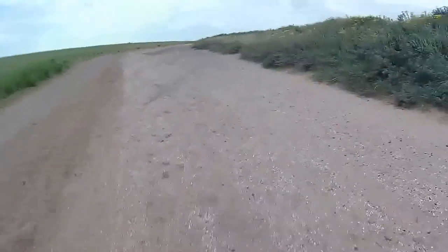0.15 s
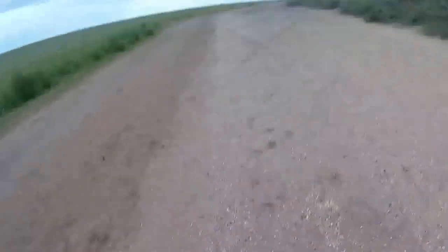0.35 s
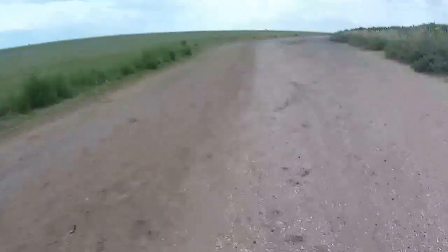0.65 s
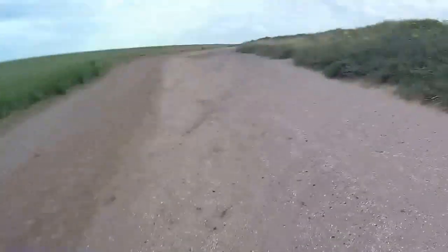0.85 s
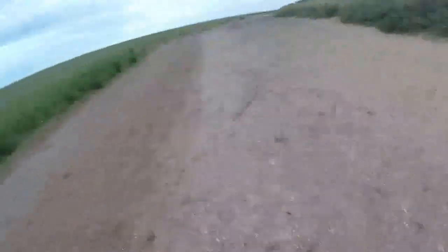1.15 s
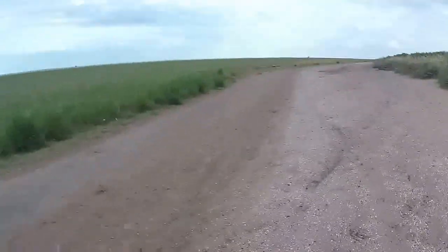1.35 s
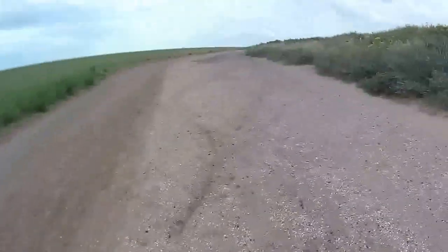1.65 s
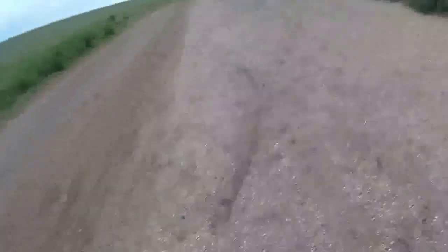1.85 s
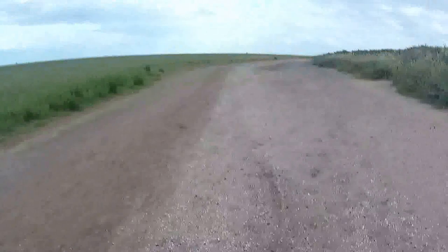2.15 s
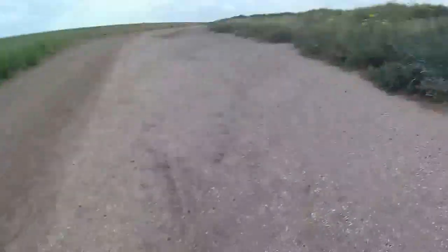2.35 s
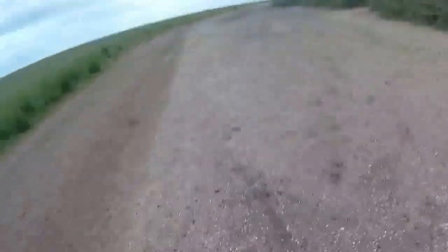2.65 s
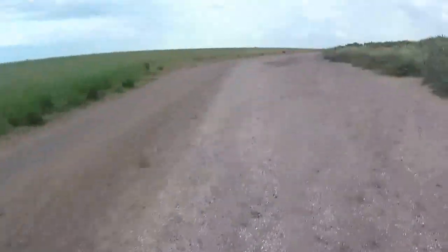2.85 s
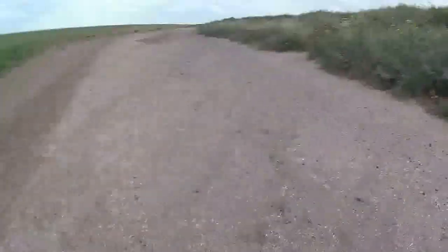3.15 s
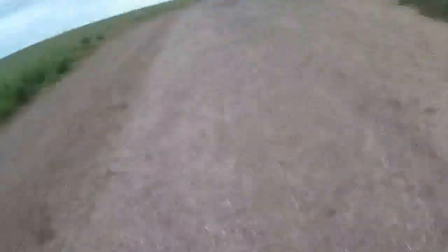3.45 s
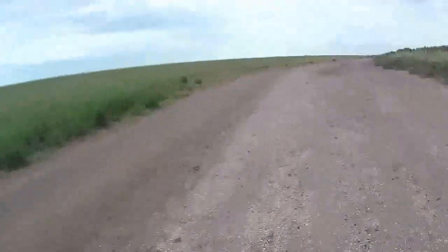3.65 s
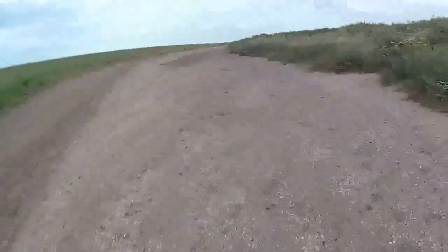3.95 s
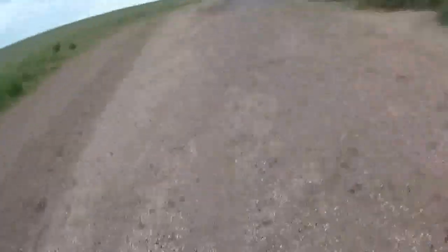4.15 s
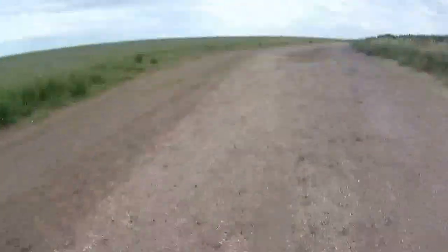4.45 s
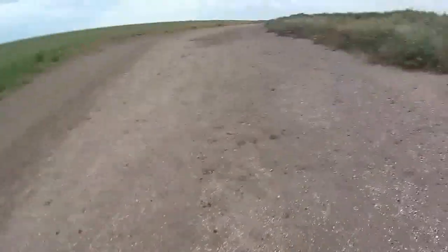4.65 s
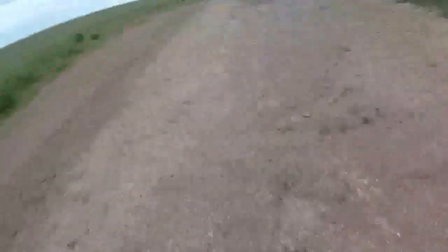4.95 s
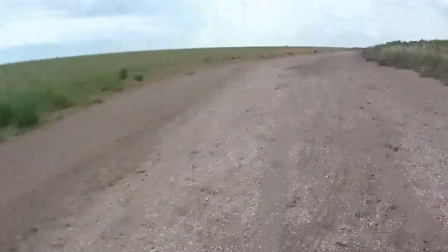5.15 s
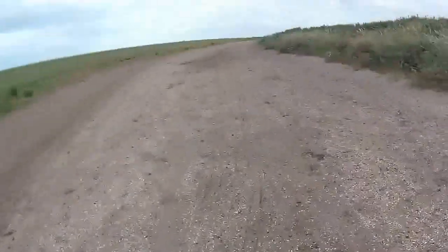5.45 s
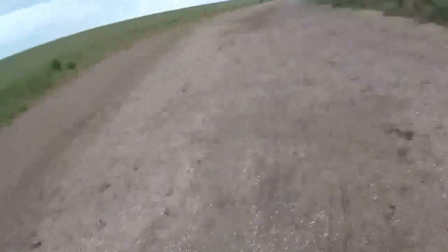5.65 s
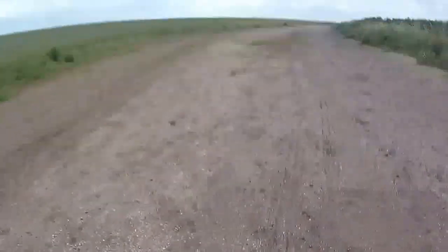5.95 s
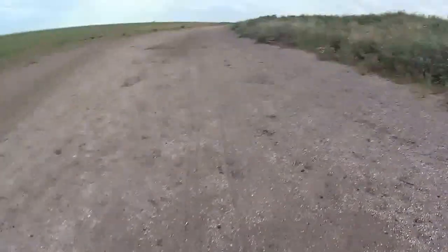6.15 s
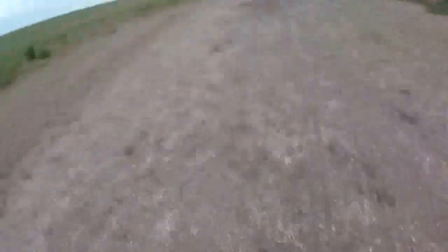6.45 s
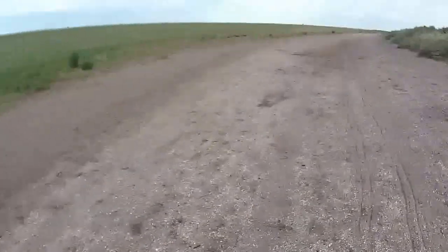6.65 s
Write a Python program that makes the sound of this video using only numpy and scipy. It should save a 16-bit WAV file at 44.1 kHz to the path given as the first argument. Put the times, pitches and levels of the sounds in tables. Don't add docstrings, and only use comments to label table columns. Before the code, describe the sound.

Boxy plastic knocking dominates, carried through the shell into the microphone. Each stride brings quick lead-up taps, a hard distorted slam, small rebounds, then a duller landing thud and push-off bump. Scratchy strap strokes swell at every step, with gritty cracks, low rumble and faint hiss. The open-air sandy track is only hinted at by thin gravel crunch, wind and a tiny insect chirp.

```python
import sys
import numpy as np
from scipy import signal
from scipy.fft import rfft, irfft, next_fast_len
from scipy.io import wavfile
from scipy.ndimage import map_coordinates

SR = 44100
rng = np.random.default_rng(int(sys.argv[2]) if len(sys.argv) > 2 else 0)


def ratio(d):
    e = np.asarray(d, float) / 20
    return 10 ** e


def to_wav(s):
    ch = np.atleast_2d(s).T
    pcm = np.round(np.clip(ch, -1, 1) * 32767)
    wavfile.write(sys.argv[1], SR, pcm.astype(np.int16))


N = 299439


def unit(x):
    return x / np.sqrt(np.mean(x ** 2) + 1e-20)


def curves(rows):
    s, *columns = np.transpose(rows)
    return [np.interp(np.arange(N) / SR, s, column) for column in columns]


def wobble(rate):
    knots = rng.standard_normal(int(N * rate / SR) + 4)
    return map_coordinates(knots, [np.arange(N) * rate / SR])


def filtered(x, response):
    m = next_fast_len(N + SR // 2)
    return irfft(rfft(x, m) * response(np.fft.rfftfreq(m, 1 / SR)), m)[..., :N]


def resonance(f, center, width):
    return 1j * f * width / (center * center - f * f + 1j * f * width)


# frequency in Hz, width in Hz, level in dB.
THUD = [(42.7, 84, -14), (89, 66.6, -1.5), (196, 136, 3), (271, 152.4, 1.5)]
HOLLOW = [(575, 212, -7.5), (872.5, 91, -2.5), (1140, 98, -0.5)]
RING = [(1404, 177, -10.5), (1737, 173, -3), (2078, 175, 0.5), (2312, 207, -4.5), (2490, 90, -7.5),
        (2881, 191, -8), (3387, 204, -9.5), (3880, 440, -13.5)]
BRIGHT = [(4900, 910, -0.5), (5360, 480, 5.5), (6160, 140, -7)]
EDGE = [(8490, 360, 2.5), (10400, 300, -7), (11000, 970, -6), (13600, 1500, -5.5)]


def shell(x, modes, wall_hz):
    def response(f):
        ring = sum((-1) ** k * ratio(db) * resonance(f, hz, width) for k, (hz, width, db) in enumerate(modes))
        ring = ring / (1 + 1j * f / wall_hz) ** 2
        return ring / np.sqrt(np.mean(abs(ring) ** 2))
    return filtered(x, response)


def grit(rate, spread_db):
    happens = rng.random(N) < rate / SR
    size = ratio(spread_db * np.minimum(rng.exponential(size=N), 4))
    slips = happens * size * rng.choice([-1, 1], N)
    return unit(unit(slips) + 0.71 * rng.standard_normal(N))


def contacts(s, ms):
    size = SR // 50
    u = np.arange(size) / SR / (np.clip(ms, 0.2, 5)[:, None] / 1000)
    rattle = rng.standard_normal((len(s), size)) * np.sqrt(u + 2.0) * np.exp(-u)
    rattle /= np.linalg.norm(rattle, axis=1, keepdims=True)
    push = -1.0 * (u == 0)
    where = np.round(s * SR).astype(int)[:, None] + np.arange(size)

    def train(force, db):
        return np.bincount(where.ravel(), (force * ratio(db)[:, None]).ravel(), N + size)[:N]
    return rattle, push, train


# stroke in seconds, stroke level in dB, rise in seconds, push in seconds, push level in dB.
STROKES = [(0.029, -26.5, 0.038, 0.27, -39), (0.43, -25, 0.045, 0.55, -32),
           (0.807, -23.5, 0.031, 0.98, -36), (1.186, -27.5, 0.043, 1.39, -41),
           (1.561, -28.5, 0.039, 1.695, -37), (1.958, -26.5, 0.058, 2.065, -32.5),
           (2.322, -27, 0.032, 2.424, -40.5), (2.72, -29, 0.038, 2.85, -34.5),
           (3.094, -25, 0.032, 3.248, -32.5), (3.476, -25, 0.02, 3.567, -28.5),
           (3.848, -28.5, 0.026, 4.06, -40), (4.252, -27, 0.056, 4.355, -32.5), (4.61, -30, 0.038, 8, -45),
           (5.011, -27, 0.055, 5.12, -32.5), (5.372, -26.5, 0.057, 5.43, -33),
           (5.744, -30.5, 0.055, 5.87, -37.5), (6.1, -29.5, 0.034, 6.3, -40.5),
           (6.469, -27, 0.039, 6.535, -33), (6.84, -26, 0.071, 6.95, -27)]
# time in seconds, slack level in
# dB, letting go in seconds.
SLACK = [(0.304, -61, 0.023), (0.663, -48.5, 0.0099), (1.083, -55, 0.31), (1.487, -49, 0.15),
         (1.819, -57.5, 0.048), (2.204, -48, 0.02), (2.604, -62, 0.052), (2.785, -39.5, .012),
         (2.99, -48, 0.058), (3.366, -58, 0.1), (3.811, -50, 0.15), (4.106, -56.5, 0.035),
         (4.48, -50.5, 0.026), (4.879, -58, 0.052), (5.248, -52, 0.018), (5.53, -43, 0.034),
         (5.667, -47.5, 0.12), (6.001, -60, 0.062), (6.25, -38.5, 0.033), (6.336, -66.5, 0.026),
         (6.715, -51.5, 0.01),
         (1.5, -41, 0.02),
    (3.548, -41, 0.015),
    (5.2, -46, 0.039),
    (2.36, -39, 0.01),
]
# time in seconds, level in dB.
CATCHES = [(0.06, -33), (0.61, -40), (1.303, -30), (2.13, -34), (2.28, -43), (2.546, -35.5), (2.629, -44),
           (2.76, -34), (3.62, -37.5), (4.455, -42.5), (4.7, -37), (5.631, -45.5), (6.19, -33.5),
           (6.599, -31.5), (0.565, -31.5), (0.83, -31), (1.335, -37), (1.39, -29.5), (3.51, -33.5),
           (3.68, -31), (4.23, -30.5), (6.67, -31), (0.87, -31), (3.865, -35.5)]


def pressure():
    start_db, fall_s, dip_db, hold_db = -46, 0.034, -40.5, -39.5
    catch_db_per_s = 410
    points = []
    for s, db, rise, push_s, push_db in STROKES:
        points += [(s - rise, start_db), (s, db), (s + fall_s, dip_db), (push_s, push_db)]
    for s, db, let_go in SLACK:
        points += [(s - let_go, hold_db), (s, db)]
    t = np.arange(N) / SR
    steps = curves(sorted(points))[0]
    return np.max([steps] + [db - catch_db_per_s * abs(t - s) for s, db in CATCHES], axis=0)


# frequency in Hz, density in dB per Hz.
HISS = [(20, 6), (60, 8), (200, -20), (700, -15.5), (2100, -21), (4500, -50), (7000, -31.5), (13600, -66),
        (14220, -33), (14800, -36)]


def floor(scrape_db):
    f, db = np.transpose(HISS)
    noise = rng.standard_normal((2, N))
    a, b = filtered(noise, lambda hz: ratio(np.interp(np.log(hz + 1), np.log(f), db)))
    wind = filtered(np.array([a + 0.19 * b, a - 0.6 * b]), lambda hz: hz < 90)
    hiss = filtered(np.array([a + 0.11 * b, a - 0.1 * b]), lambda hz: hz >= 90)
    gusts = ratio(1.4 * wobble(12) + 0.84 * (scrape_db + 40.0))
    return ratio(-46.0) * unit(gusts * wind + hiss)


# start in seconds, end in seconds, pitch in Hz, level in dB, pulses a second.
INSECTS = [
    (1.833, 1.886, 6000, -58, 167),
    (3.62, 3.693, 6600, -66, -2),
]


def insects():
    t = np.arange(N) / SR
    out = 0
    for start, end, hz, db, rate in INSECTS:
        swell = np.sqrt(np.clip(4 * (t - start) * (end - t), 0, None)) / (end - start)
        pulses = np.cos(np.pi * rate * t) ** 10
        tone = np.sin(2 * np.pi * hz * t + wobble(300))
        out = out + ratio(db + 2 * wobble(60)) * swell * pulses * tone
    return out


# time in seconds, level in dB.
SPRAYS = [(0.88, -60), (1.865, -59), (2.61, -60), (2.92, -62), (5.03, -57), (5.45, -59), (6.28, -58),
          (6.5, -61), (3.68, -64), (1.58, -62), (1.545, -65), (6.08, -61)]


def spray():
    t = np.arange(N) / SR
    half_s = 2 * 0.015
    return sum(ratio(db) * np.clip(1 - ((t - s) / half_s) ** 2, 0, 1) ** 2 for s, db in SPRAYS)


# frequency in Hz, width in Hz, level in dB.
AIR = [(10100, 7100, -6.5), (12400, 3600, -1.5), (14440, 340, 2.5)]


def crunch(scrape_db):
    sand = shell(grit(rate=5000, spread_db=3), AIR, wall_hz=18900)
    flicker = ratio(3 * wobble(110))
    strokes = ratio(-69.5 + 1.07 * (scrape_db + 37.5))
    return (ratio(-69.5) + strokes * flicker + spray() * flicker) * unit(sand)


# time in seconds, pitch in Hz, level in dB.
SQUEAK = [
    (4.893, 3420, -72),
    (4.9, 3440, -68),
    (4.906, 3300, -61),
    (4.96, 3340, -62),
    (4.975, 3305, -80),
]
# multiple of the pitch, level in dB.
SQUEAK_TONES = [(1, 1), (2, -2), (3, -4), (4, -8)]


def squeak():
    hz, db = curves(SQUEAK)
    t = np.arange(N) / SR
    turn = 2 * np.pi * np.cumsum(hz) / SR
    tone = sum(ratio(level + 1.5 * wobble(90)) * np.sin(k * turn) for k, level in SQUEAK_TONES)
    return ratio(db) * tone * (t > SQUEAK[0][0]) * (t < SQUEAK[-1][0])


# time in seconds, peak level in dB.
THUMPS = [(0.228, -26), (1.148, -29), (1.698, -26), (2.286, -24.5), (2.418, -34.5), (3.588, -31.5),
          (3.797, -19.5), (3.815, -29), (4.356, -36), (4.638, -36), (6.132, -30), (6.438, -29.5),
          (5.118, -37), (5.9, -37)]


def thumps():
    s, db = np.transpose(THUMPS)
    shove = np.bincount(np.round(s * SR).astype(int), -ratio(db + 26), N)
    return shell(shove, THUD[1:], wall_hz=500)


# time in seconds, peak level in dB,
# bright level in dB.
CRACKS = [(0.0343, -20, -14), (0.0594, -18, -11), (0.426, -18, -19), (0.4424, -24, -14), (0.5631, -20, -16),
          (0.623, -16, -16), (0.8294, -26, -14), (0.8744, -22, -14), (1.1882, -22, -16), (2.42, -19, -16),
          (2.4864, -35, -14), (2.4977, -21, -14), (2.7571, -21, -14), (3.1094, -18, -16.5),
          (4.2448, -21, -14), (4.2564, -19, -14), (4.2832, -20, -17), (4.3534, -23, -14),
          (4.3684, -26, -14), (4.629, -27, -12), (4.7094, -29, -14), (4.999, -13, -18), (5.362, -14, -14),
          (5.389, -16, -13), (5.5734, -26, -14), (6.1124, -19, -14), (6.212, -21, -14), (6.539, -30, -14),
          (6.6694, -25, -15),
          (0.3944, -28, -16),
    (1.669, -25, -16),
    (3.492, -17, -16),
    (3.6094, -26, -16),
    (4.8033, -15, -15.5),
    (5.699, -22, -18),
]


def cracks():
    s, db, bright_db = np.transpose(CRACKS)
    rattle, _, train = contacts(s, np.full(len(s), 1.2))
    peak_db = db + 8.5
    return (shell(train(rattle, peak_db), RING, wall_hz=4000)
            + shell(train(rattle, peak_db + bright_db), BRIGHT, wall_hz=15000))


# time in seconds, rumble level in dB, dying rate in dB per second.
LURCHES = [(0.025, -37, 56), (0.409, -37, 47), (0.93, -33.5, 126), (1.237, -33.5, 115), (1.541, -32, 142),
           (1.691, -32.5, 202), (1.881, -36.5, 30), (2.29, -32, 400), (2.614, -39.5, 60), (3.24, -35, 150),
           (3.392, -38, 60), (3.692, -37, 30), (4.166, -40, 59), (5.37, -33.5, 89), (5.961, -45, 302),
           (6.211, -44, 160), (6.435, -43, 80), (0.83, -41, 150), (1.15, -36, 150), (2.02, -40, 150),
           (2.71, -34, 150), (3.13, -33, 150), (3.59, -35, 150), (4.35, -41, 120), (4.64, -38, 120),
           (4.95, -33.5, 120), (5.07, -37.5, 150), (5.56, -34, 100), (5.68, -34.5, 100), (5.81, -36, 150),
           (6.08, -38, 100)]


def sway(effort_db):
    rise_db_per_s = 152
    t = np.arange(0, N / SR, 0.001)
    lurch = sum(ratio(db - np.where(t > s, dying, rise_db_per_s) * abs(t - s)) ** 2 for s, db, dying in LURCHES)
    steady = ratio(-43 + 0.24 * effort_db)
    return np.sqrt(np.interp(np.arange(N) / SR, t, lurch) + steady ** 2)


# frequency in Hz, width in Hz, level in dB.
BODY = [(655, 500, -1), (1300, 600, 1), (2600, 1300, -2.5)]


def rubbing(scrape_db):
    force = grit(rate=1200, spread_db=3) * ratio(2.2 * wobble(220))
    coarse = grit(rate=1500, spread_db=2.5)
    other_force, other_coarse = np.roll(force, SR), np.roll(coarse, SR)
    spots = ratio(1.6 * np.array([wobble(30), wobble(30), wobble(40)]))
    scrape = unit(shell(force * spots[0], RING[:4], wall_hz=5600)
                  + ratio(-3.5) * shell(coarse * spots[1], RING[4:], wall_hz=6100)
                  + ratio(-6.5) * shell(other_force * spots[2], RING[2:3], wall_hz=5000)
                  + ratio(-9) * shell(force, HOLLOW, wall_hz=2480)
                  + ratio(-10.5) * shell(other_coarse, BODY, wall_hz=4000))
    heave = ratio(2 * wobble(22))
    rumble = unit(shell(force * heave, THUD, wall_hz=1230))
    fizz = unit(shell(coarse, BRIGHT, wall_hz=16200) + ratio(-7.5) * shell(force, EDGE, wall_hz=16000))
    effort_db = scrape_db + 38
    return (ratio(scrape_db - 1) * scrape
            + sway(effort_db) * ratio(-6.5 + 0.26 * effort_db) * rumble
            + (ratio(-90) + ratio(-60.0 + 1.21 * effort_db)) * fizz)


# time in seconds, peak level
# in dB.
SNAPS = [(0.3607, -26), (0.7504, -34), (0.9453, -27), (1.125, -24), (1.4434, -32), (1.8896, -24),
         (2.2754, -23.5), (2.6356, -19), (3.0405, -25), (3.248, -28), (3.4204, -22), (3.794, -31),
         (4.171, -26), (4.6274, -32), (4.9297, -31.5), (5.017, -29), (5.388, -25.5), (5.6837, -22),
         (6.4152, -27.5), (0.058, -33), (0.7612, -29), (0.9882, -38), (1.3823, -37), (2.837, -40),
         (3.6053, -31), (4.2542, -36), (4.26, -32), (5.467, -29), (5.5717, -31), (1.5055, -28),
         (0.442, -36), (0.528, -34), (1.037, -35), (1.37, -39), (2.816, -36), (3.804, -33), (3.863, -37),
         (4.558, -23), (6.116, -29), (6.6448, -34), (5.321, -32), (5.939, -33), (5.949, -41), (0.833, -31)]


def snaps():
    dry_edge = [(s, db - 33) for s, db in LEAD_DRY]
    hollow_edge = [(s, db - 32) for s, db in LEAD_HOLLOW]
    s, db = np.transpose(SNAPS + dry_edge + hollow_edge)
    rattle, push, train = contacts(s, np.full(len(s), 1.3))
    return shell(train(rattle, db + 4.5), EDGE, wall_hz=16800)


# time in seconds, peak level in dB, bright level in dB, contact time in ms.
SLAMS = [
    (0.742, 8, -17, 0.68),
    (1.4982, 7.5, -23, 1.9),
    (2.2636, 7.5, -30, 0.63),
    (3.0287, 7, -31, 1.6),
    (3.7949, -0.5, -15, 4),
    (4.5474, 2, -12, 2),
    (5.312, 3.5, -14, 0.46),
    (6.0399, 2, -17, 2.4),
    (6.7828, 4.5, -11, 1.2),
]


def slams():
    s, db, *_ = np.transpose(SLAMS)
    rattle, _, train = contacts(s + 0.00248, np.full(len(s), 2.2))
    chatter = train(rattle, db - 1)
    return (shell(chatter, RING, wall_hz=3000) + ratio(-12.5) * shell(chatter, HOLLOW, wall_hz=2700)
            + ratio(-30) * shell(chatter, BRIGHT, wall_hz=15000))


# time in seconds, peak level in dB.
REBOUNDS = [(0.751, -18), (0.7611, -8), (1.509, -8), (1.5298, -13.5), (2.278, -12.5), (2.2965, -13),
            (3.0432, -8.5), (3.066, -15), (3.825, -12), (4.557, -6.5), (4.5706, -17), (5.3199, -10.5),
            (6.0682, -11.5)]
# time in seconds, peak level in dB.
LEAD_TICKS = [
    (0.5889, -9.5),
    (1.356, -13.5),
    (2.1278, -10.5),
    (2.882, -14),
    (3.6365, -10),
    (4.4125, -21),
    (5.1716, -9),
    (6.628, -11.5),
]
# time in seconds, peak level in dB.
LEAD_HOLLOW = [
    (0.6381, -8.5),
    (1.405, -4.5),
    (2.1685, -6),
    (2.928, -8),
    (3.7087, -7),
    (4.4543, -2.5),
    (5.2107, -6.5),
    (5.9494, -2),
    (6.695, -4),
]
# time in seconds, peak level in dB.
LEAD_DRY = [
    (0.6983, -9.5),
    (1.4378, -3.5),
    (2.2086, -5),
    (2.9658, -7.5),
    (3.7445, -9.5),
    (4.4894, -6),
    (5.2613, -10),
    (5.9823, -8),
    (6.731, -7.5),
]
# time in seconds, peak level in dB, extra bright
# level in dB.
RETURNS = [
    (0.3867, -15.5, -11),
    (0.879, -16, 5),
    (1.6417, -12.5, 2),
    (1.9022, -14.5, -6),
    (2.4003, -12.5, 0),
    (3.9233, -12, -6),
    (3.9985, -13.5, -20),
    (4.6824, -13.5, -3),
    (6.1673, -12.5, 1),
    (6.4507, -15, -.1),
]
# time in seconds, peak level in dB.
LANDINGS = [
    (0.3607, -11.5),
    (1.1254, -11),
    (1.8902, -11),
    (2.6365, -7),
    (3.4218, -10),
    (4.1721, -11),
    (4.9303, -14),
    (5.6835, -8.5),
    (6.4162, -12.5),
]
# time in seconds, peak level in dB, extra bright level in dB.
PUSH_OFFS = [
    (0.2583, -10, 4.5),
    (1.7855, -9.5, -.1),
    (1.7925, -16, -2),
    (2.5448, -9, -2),
    (4.064, -15, -8),
    (4.8182, -11, 1.5),
    (5.4676, -9, 8.5),
    (5.5986, -9.5, -3),
    (6.2459, -16.5, -2),
]
# time in seconds, peak level in dB, hollow level in dB, bright level in dB.
DULL = [
    (0.2317, -13.5, -6, -35),
    (0.9107, -12, -15, -13),
    (2.4676, -15, -10, -24),
    (2.5237, -6, -10, -27),
    (2.5538, -19, -14, -19),
    (3.2253, -8.5, -10, -11),
    (5.443, -16, -6, -16),
    (5.5599, -14, -11.5, -24),
]
# time in seconds, peak level in dB, hollow level in dB, bright level in dB.
CLACKS = [(0.275, -17, -17, -16), (0.803, -15, -39, -16), (0.932, -11.5, -10.5, -39),
          (0.945, -3, -16.5, -29), (0.99, -24, -22, -22), (1.1527, -14, -13, -26), (1.273, -1, -12.5, -60),
          (1.698, -13.5, -22, -45), (2.2593, -15, -21, -31), (2.5103, -18, -31, -13),
          (2.646, -12, -11, -27), (3.2316, -4.5, -15, -34), (3.2471, -0.5, -35, -21),
          (3.491, -18, -11, -25), (3.781, -10, -23, -39), (3.8534, -14.5, -33, -19), (4.281, -21, -35, -39),
          (4.945, -10, -11, -37), (5.0181, -10.5, -36, -15), (5.1232, -16.5, -29, -29),
          (5.4782, -3, -13, -24), (5.4978, -9, -15, -25), (5.7816, -19, -32, -18)]
# time in seconds, peak level in dB, thud level in dB.
NUDGES = [(0.1037, -17.5, -15.5), (1.104, -28.5, -5), (1.226, -19.5, -14), (1.5526, -22.5, -11),
          (1.6812, -29, -6.5), (2.6266, -24, -7), (3.166, -21, -9), (3.397, -30.5, -2.5),
          (3.458, -24.5, -7.5), (4.209, -30.5, -5), (4.776, -34, -6), (5.212, -26, -3), (5.672, -22, -10),
          (6.6, -26, -27), (6.05, -36, 5), (6.206, -25.5, -4), (2.2765, -24, 2), (3.04, -24, -11),
          (3.529, -36, -8), (4.302, -45, 15), (1.1, -36, -5), (2.705, -38.5, 3), (1.985, -41.5, 2),
          (3.998, -22, -6), (4.4, -33, 8), (3.219, -36, 7), (3.545, -39, 3), (3, -41, 2.5), (0.42, -42, 5),
          (5.304, -26, -15), (4.8, -26, -13)]
# time in seconds, peak level in dB.
FAINT = [(0.3318, -24), (0.341, -28), (0.508, -19), (0.612, -25), (0.6774, -25), (0.7392, -18),
         (1.0553, -29.5), (1.867, -29), (2.275, -7), (2.7575, -20), (2.816, -24.5), (2.8378, -30),
         (2.914, -17), (3.3043, -26), (3.3264, -28), (3.4055, -23), (3.9585, -27), (4.0425, -23),
         (4.151, -32), (4.2098, -20), (4.541, -33), (4.386, -31), (4.8945, -24), (5.0768, -32),
         (5.623, -27), (5.635, -29), (5.8255, -33), (2.186, -30), (2.281, -19), (3.262, -20), (5.305, -28),
         (2.95, -38), (6.0247, -31), (6.4009, -26), (6.584, -20), (6.656, -23)]
# thud level in dB, hollow level in dB, bright level in dB, contact time in ms.
REBOUND, LEAD_TICK, HOLLOW_KNOCK = (-18.5, -12.5, -26, 2), (-20.5, -18, -1, 2), (-21, -4.5, -39, 2)
DRY_KNOCK, RETURN, LANDING = (-24.5, -11, -24, 3), (-17, -6, -10.5, 3), (-29.5, -20, -24, 3)
TOUCH = (-27, -17.5, -35, 3.5)
PUSH_OFF = (-30, -12, -13, 1.5)


def contact_rows():
    kinds = [(REBOUNDS, 0, REBOUND), (LEAD_TICKS, TICK_SPOT[0], LEAD_TICK),
             (LEAD_HOLLOW, HOLLOW_SPOT[0], HOLLOW_KNOCK), (LEAD_DRY, DRY_SPOT[0], DRY_KNOCK),
             (RETURNS, RETURN_SPOT[0], RETURN), (LANDINGS, LANDING_SPOT[0], LANDING),
             (PUSH_OFFS, PUSH_SPOT[0], PUSH_OFF), (FAINT, 0, TOUCH)]
    out = []
    for rows, loose_db, (thud, hollow, bright, ms) in kinds:
        for s, db, *extra_db in rows:
            out.append((s, db + loose_db, thud, hollow, bright + sum(extra_db), ms))
    out += [(s, db + SLAM_SPOT[0], -23.5, -11, bright, ms) for s, db, bright, ms in SLAMS]
    out += [(s, db, -16.5, hollow, bright, 3.4) for s, db, hollow, bright in DULL]
    out += [(s, db, -31, hollow, bright, 1.7) for s, db, hollow, bright in CLACKS]
    out += [(s, db, thud, -3.5, -27, 0.56) for s, db, thud in NUDGES]
    return out


def knocks():
    s, db, thud_db, hollow_db, bright_db, ms = np.transpose(contact_rows())
    rattle, push, train = contacts(s, ms)
    thud = train(push + 0.5 * rattle, db + thud_db + 25.5)
    hollow = train(push + 1.24 * rattle, db + hollow_db + 15)
    ring = train(rattle + 0.3 * push, db + 11.5)
    bright = train(rattle, db + bright_db + 10.0)
    return (shell(thud, THUD, wall_hz=1490) + shell(hollow, HOLLOW, wall_hz=2800) + shell(ring, RING, wall_hz=3440)
            + shell(bright, BRIGHT, wall_hz=15100) + ratio(-15.5) * shell(bright, EDGE, wall_hz=15000))


# loose rattle in dB, contact cut-off in Hz, damping as a factor on mode width,
# then the swing of each thud, hollow and ring mode from the second thud mode up.
SLAM_SPOT = (-7, 3130, 1.5, [-7, 4, -4, 5.5, 3, -7.5, 12.5, -29, -6.5, 21.5, 2.5, 9.5, 0, 1])
HOLLOW_SPOT = (-1.25, 1600, 0.96, [-15.5, -42, 21.5, 19, 27, 43, 19, 9, 11, -27, -10, 23, 9, -5])
DRY_SPOT = (-5.5, 1900, 0.77, [7.5, -2, 5, 19, -1, 2, 26, -61, 82, -28, 8, -26, -4, 4])
LANDING_SPOT = (-1.2, 950, 0.89, [-44, 61, 7, 18.5, -11, 88, 26, 40, -60, 66, 11, 46, -85, 44])
TICK_SPOT = (-10, 1040, 1.0, [5, -3.5, -17, -7, -6, -35, -19, 19, -196, 128, 50, 62, 111, -60])
PUSH_SPOT = (-1.8, 3100, 0.83, [11, -61, 37, 8, -6, 23, -4, -15, -35, 44, 20, -14, -12, -3])
RETURN_SPOT = (-5, 2280, 2.76, [8.5, -15, 7.5, -2, -24.5, 25.5, -22, 21, -94, 79, -21, -9, 0, -13])


def strikes():
    size, lead = 4096, 32
    out = np.zeros(N + SR)
    f = np.fft.rfftfreq(size, 1 / SR)
    seats = [(s + 0.002602, db - 6.5) for s, db in LEAD_HOLLOW]
    clean_rebounds = [(s, db - 4.5) for s, db in REBOUNDS]
    clean_clacks = [(s, db - 14) for s, db, *_ in CLACKS]
    blows = [(SLAMS, SLAM_SPOT), (LEAD_HOLLOW, HOLLOW_SPOT), (LEAD_DRY, DRY_SPOT), (LANDINGS, LANDING_SPOT),
             (LEAD_TICKS, TICK_SPOT), (PUSH_OFFS, PUSH_SPOT), (RETURNS, RETURN_SPOT), (seats, HOLLOW_SPOT),
             (clean_rebounds, DRY_SPOT), (clean_clacks, RETURN_SPOT)]
    for rows, (_, cut_hz, damping, swing) in blows:
        modes = np.array([resonance(f, hz, width * damping) for hz, width, _ in THUD[1:] + HOLLOW + RING])
        softness = (1 + 1j * f / cut_hz) ** 2 * np.sqrt(1 + (f / 4600) ** 10)
        rings = np.roll(irfft(modes / softness), lead, axis=1)
        scatters = rng.standard_normal((len(rows), len(swing)))
        for (s, db, *_), scatter in zip(rows, scatters):
            start = round(s * SR) - lead
            out[start:][:size] += ratio(db) * (swing * (1 + 0.084 * scatter)) @ rings
    return out[:N]


# frequency in Hz, width in Hz, share blocked.
WALL_DIP = (7060, 1320, 0.53)


def scene():
    scrape_db = pressure()
    sides = ratio([[-1.6], [1.4]])
    hz, width, share = WALL_DIP
    body = knocks() + strikes() + slams() + rubbing(scrape_db)
    body = filtered(body, lambda f: 1 - share * resonance(f, hz, width))
    shell_borne = (body + squeak() + cracks() + thumps()) * sides
    return shell_borne + snaps() + crunch(scrape_db) + insects() + floor(scrape_db)


def low_pass(x):
    return signal.sosfilt(signal.butter(12, 15990, fs=SR, output="sos"), x)


OFFSETS = [
    [-.0247],
    [.0128],
]


def record(dry):
    x = filtered(dry, lambda hz: hz < 15350) + OFFSETS
    x = np.clip(x, -1, 1)
    return low_pass(x)


dry = scene()
out = record(dry)
to_wav(out)
```